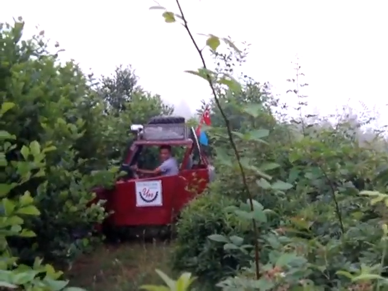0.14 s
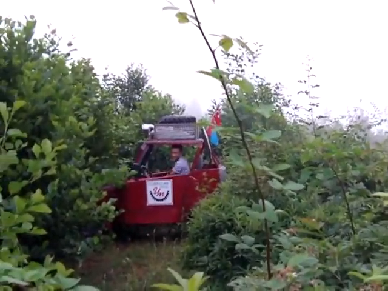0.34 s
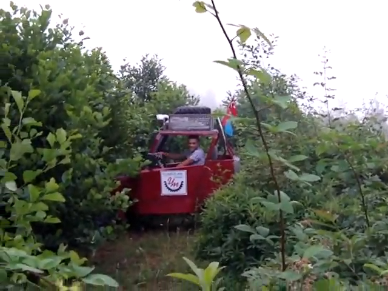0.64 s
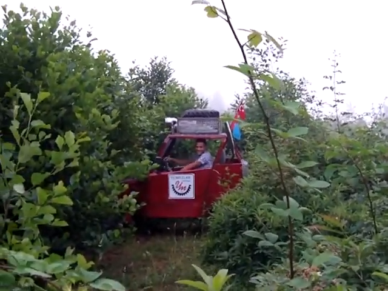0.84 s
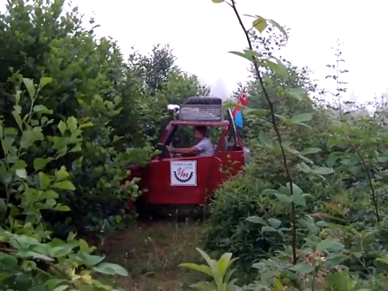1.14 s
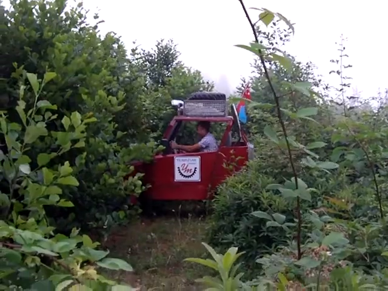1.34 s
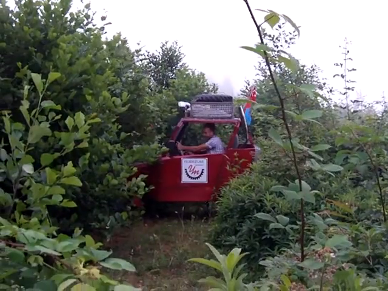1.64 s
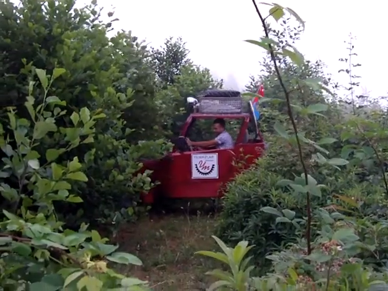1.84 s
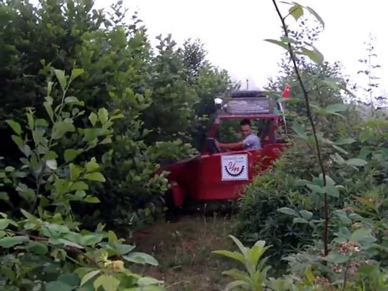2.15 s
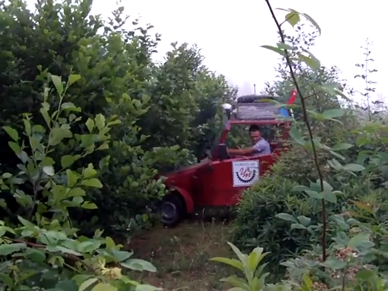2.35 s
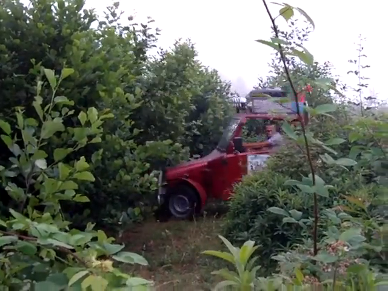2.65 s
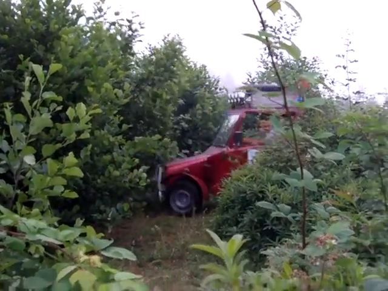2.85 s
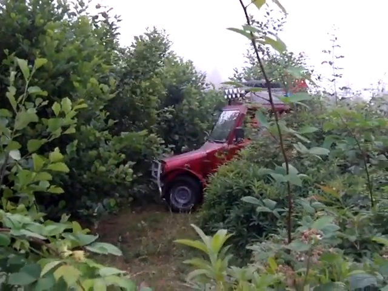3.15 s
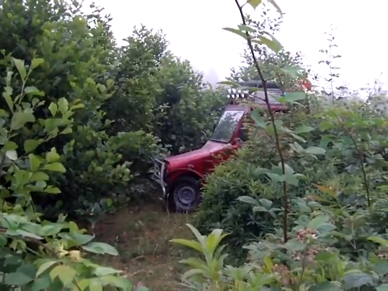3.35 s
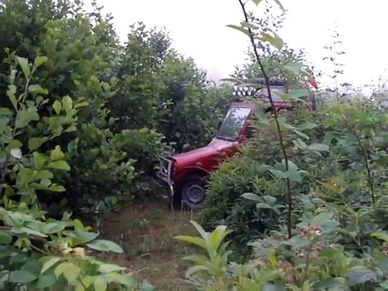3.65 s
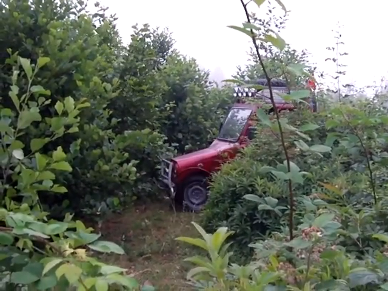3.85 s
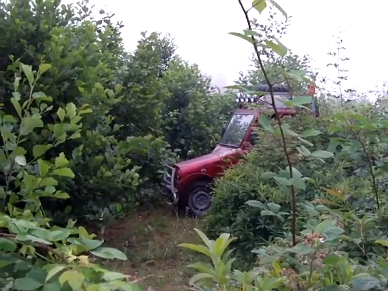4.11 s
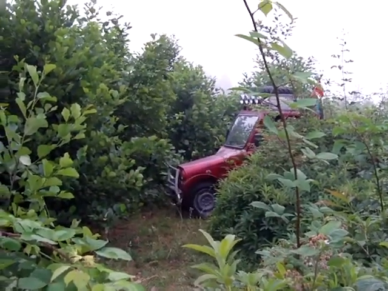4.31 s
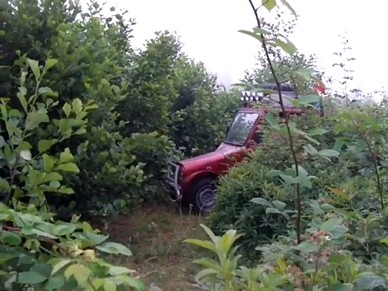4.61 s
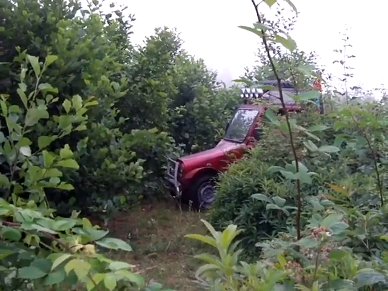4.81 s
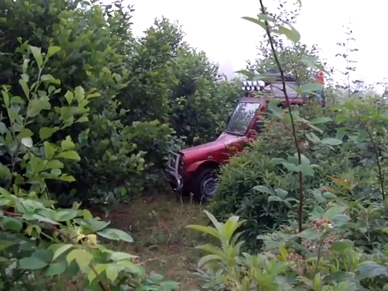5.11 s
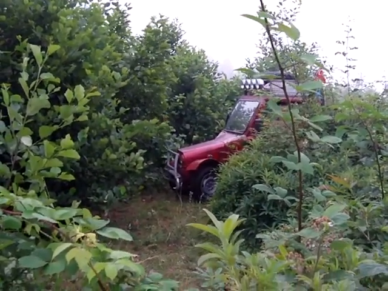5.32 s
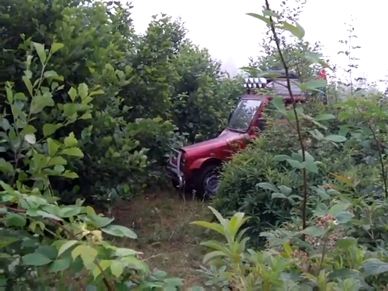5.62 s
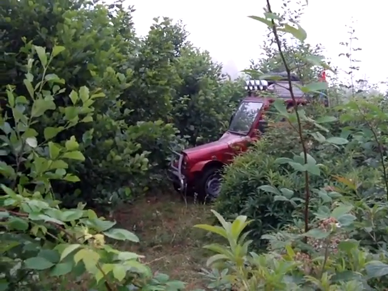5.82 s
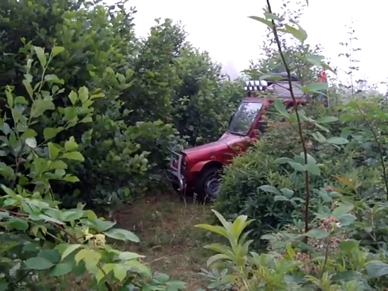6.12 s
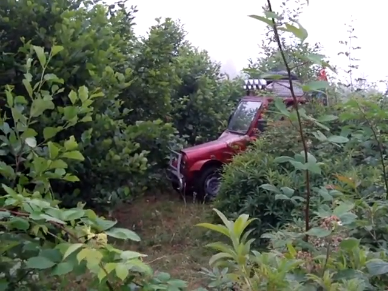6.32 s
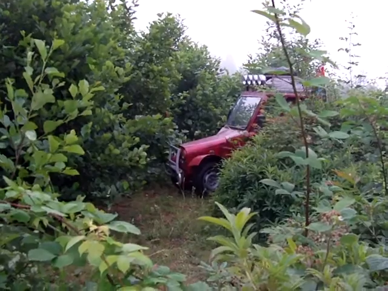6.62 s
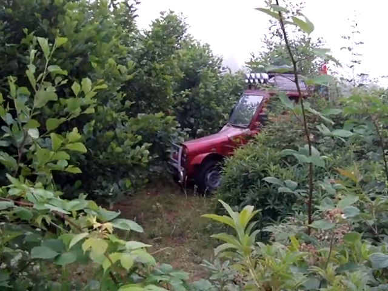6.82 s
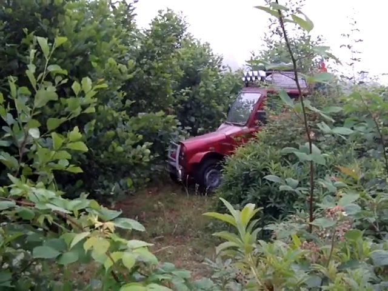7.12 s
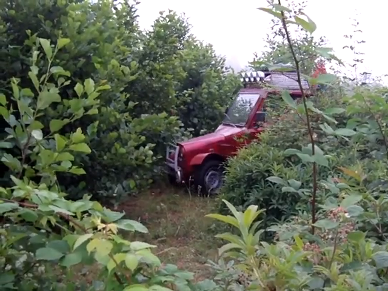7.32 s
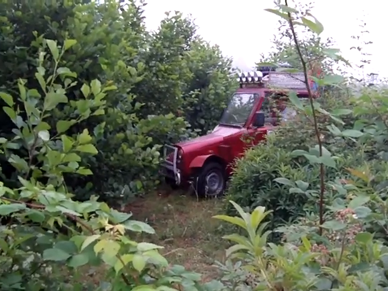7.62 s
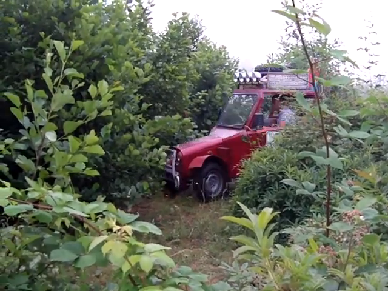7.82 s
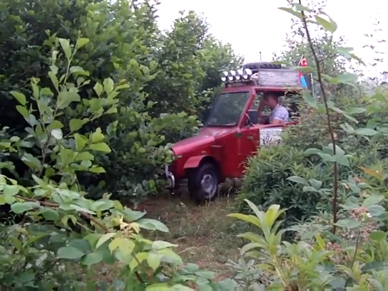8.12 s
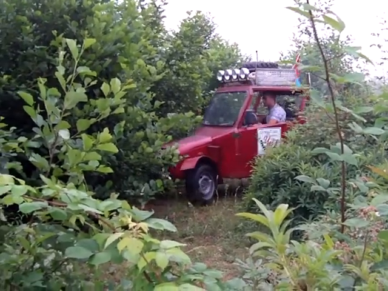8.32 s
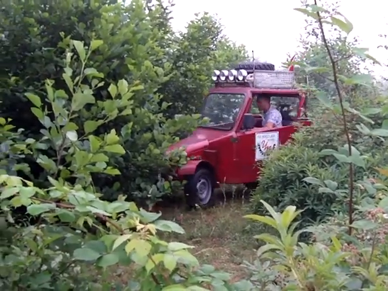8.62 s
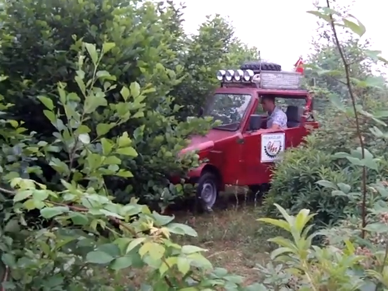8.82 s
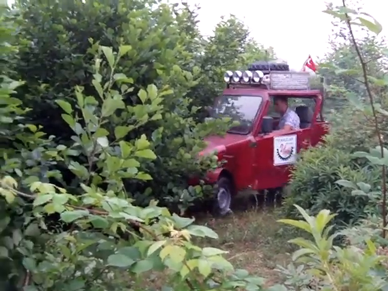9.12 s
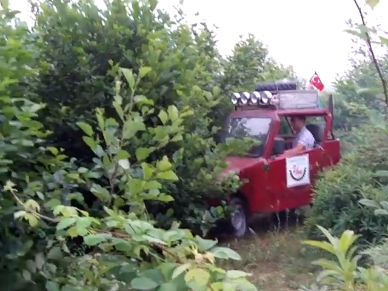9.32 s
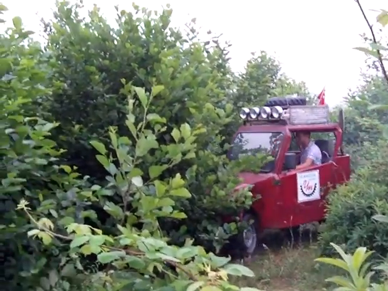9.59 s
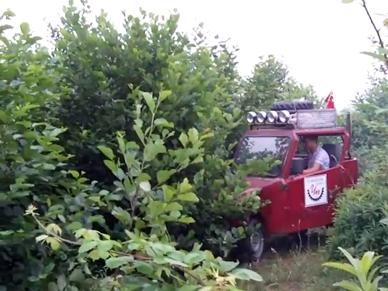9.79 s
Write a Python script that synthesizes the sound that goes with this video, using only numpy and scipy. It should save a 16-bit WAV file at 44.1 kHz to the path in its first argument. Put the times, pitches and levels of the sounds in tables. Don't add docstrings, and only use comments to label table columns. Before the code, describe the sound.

A knocking single-cylinder diesel puffs through wet brush, pulling hard, settling to a slow chugging idle, then working again as twigs snap.

```python
import sys
import numpy as np
from scipy import signal
from scipy.fft import rfft, irfft, next_fast_len
from scipy.io import wavfile
from scipy.ndimage import uniform_filter1d

SR = 44100
rng = np.random.default_rng(int(sys.argv[2]) if len(sys.argv) > 2 else 0)


def decibels_to_gain(level_db):
    exponent = np.asarray(level_db, float) / 20
    return 10 ** exponent


def log_audio(samples):
    frames = np.atleast_2d(samples).T
    limited = np.clip(frames, -1, 1)
    pcm = np.round(limited * 32767).astype(np.int16)
    wavfile.write(sys.argv[1], SR, pcm)


N = 438794
TIME_S = np.arange(N) / SR

# time in seconds, engine cycles per second.
SPEED = [(0.0, 9.27), (0.58, 8.468), (1.38, 13.431), (2.25, 9.336), (2.66, 10.581), (3.34, 8.817),
         (3.85, 8.542), (3.97, 8.1), (4.4, 7.814), (6.53, 7.955), (6.84, 11.009), (7.52, 10.879),
         (7.58, 10.009), (7.99, 11.748), (8.9, 10.234), (9.11, 10.336), (9.25, 10.285), (9.95, 8.307)]
# time in seconds, level in dB.
LEAN_JET = [(0, -35.5), (1.6, -32), (2.5, -31.5), (2.7, -34.5), (3.2, -34), (3.7, -37), (4.3, -37.5),
            (5.3, -37.5), (5.6, -35.5), (6.4, -38), (7.3, -37.5), (7.9, -32), (9.95, -30.5)]
# time in seconds, level in dB.
EFFORT = [(0, -37.5), (.5, -39), (.7, -32.5), (1.05, -36), (1.48, -27), (1.77, -31), (2.08, -30.5),
          (2.44, -29), (2.7, -35), (3.02, -39), (6.55, -37.5), (7.18, -31), (7.65, -33.5), (7.84, -30),
          (8.62, -32), (8.87, -33.5), (9.65, -38.5), (9.95, -34)]


def rms_one(x):
    return x / np.sqrt(np.mean(x ** 2) + 1e-20)


def in_time(rows, s):
    return np.interp(s, *np.transpose(rows))


def band_filter(x, order, hz, kind):
    return signal.sosfilt(signal.butter(order, hz, kind, fs=SR, output="sos"), x)


def coloured(x, spectrum):
    hz, db = np.transpose(spectrum)
    size = next_fast_len(N)
    log_hz = np.log(np.arange(1, size // 2 + 2) * SR / size)
    gain = decibels_to_gain(np.interp(log_hz, np.log(hz), db))
    return rms_one(irfft(rfft(x, size) * gain, size)[:N])


def drift(rate):
    r = np.exp(-80 * np.pi * rate / SR)
    slow = signal.lfilter([1], [1, -2 * r, r * r], rng.standard_normal(N // 40 + 2002))[2000:]
    return np.interp(np.arange(N) / 40, np.arange(len(slow)), rms_one(slow))


def ring(x, hz, t60):
    r, w = decibels_to_gain(-60 / (t60 * SR)), 2 * np.pi * hz / SR
    return signal.lfilter([0, np.sin(w)], [1, -2 * r * np.cos(w), r * r], x + 1e-18)


def grains(per_s, spread_db):
    sizes = decibels_to_gain(spread_db * np.minimum(rng.exponential(1, N), 4)) * rng.choice([-1, 1], N)
    return sizes * (rng.random(N) < per_s / SR)


def tinkles(per_s, low_hz, high_hz, cycles):
    clicks, dealt = grains(per_s, spread_db=2.5), rng.integers(0, 11, N)
    pitches = np.geomspace(low_hz, high_hz, 11) * rng.uniform(.97, 1.03, 11)
    return rms_one(sum(ring(clicks * (dealt == k), hz, cycles / hz) for k, hz in enumerate(pitches)))


def resonances(x, modes, wander_db=0):
    out = 0
    for k, (hz, width, db) in enumerate(modes):
        r = np.exp(-np.pi * width / SR)
        poles = [1, -2 * r * np.cos(2 * np.pi * hz / SR), r * r]
        tone = rms_one(signal.lfilter([1, 0, -1], poles, x))
        out = out + decibels_to_gain(db + wander_db * drift(9.9)) * (-1) ** k * tone
    return rms_one(out)


def bursts(times, dbs, rises_ms, hold_ms, fall_db_ms, tail_db, tail_db_ms, jumps_db=0):
    out, ms = np.zeros(N + SR), np.arange(-2000, 5500) * 1000 / SR
    for s, db, rise, hold, jump_db in np.broadcast(times, dbs, rises_ms, hold_ms, jumps_db):
        after = np.maximum(ms - hold, 0)
        fall = decibels_to_gain(-fall_db_ms * after) ** 2 + decibels_to_gain(tail_db - tail_db_ms * after) ** 2
        onset_db = 6 * np.minimum(ms - 1.5, 0) / max(rise, .3) - jump_db * (ms < 0)
        at = round(s * SR)
        out[at:at + len(ms)] += decibels_to_gain(db + onset_db) ** 2 * fall
    return np.sqrt(out[2000:2000 + N])


def crank():
    return .106 + np.cumsum(in_time(SPEED, TIME_S)) / SR


def strokes():
    # puff start in seconds, pipe level in dB, jet hiss in dB, knock level in dB.
    first_pull = [(0.761, -19.5, -17, -19), (0.861, -19, -17, -23.5), (1.045, -18, -17, -21.5),
                  (1.214, -19.5, -17.5, -19), (1.295, -21, -18.5, -20.5), (1.372, -21.5, -21, -20.5),
                  (1.449, -20, -18, -20), (1.524, -17.5, -18, -18.5), (1.765, -21, -23.5, -20.5),
                  (1.855, -19.5, -21, -20), (1.95, -23, -26.5, -23.5), (2.043, -18, -20.5, -23),
                  (2.146, -20, -30, -27.5), (2.25, -17.5, -18.5, -22), (2.355, -17, -18, -26.5),
                  (2.457, -16.5, -18.5, -25)]
    # puff start in seconds, pipe level in dB, jet hiss in dB, knock level in dB.
    second_pull = [(6.611, -18, -21.5, -24.5), (6.717, -19, -23, -27.5), (6.816, -17.5, -21, -27),
                   (6.909, -18, -20, -27), (6.997, -17, -22, -28), (7.176, -17, -20, -22.5),
                   (7.364, -17.5, -19, -23.5), (7.458, -18.5, -23, -28), (7.555, -22, -34, -29.5),
                   (7.649, -16.5, -19, -24.5), (7.742, -19.5, -21.5, -25.5), (7.832, -20, -22, -25.5),
                   (8.547, -21.5, -31, -30), (8.736, -21.5, -33, -22.5)]
    # start in seconds, level in dB, brightness in dB.
    pinking = [(1.094, -30, -2), (1.924, -23, -1.5), (2.528, -28, -1.5), (2.61, -34, 8.5),
               (6.335, -31, 5.5), (7.897, -28.5, 3.5), (7.983, -28.5, -2), (8.889, -30, -2),
               (8.988, -29, -2), (9.085, -26, 0.5), (9.921, -28, -3)]
    # time in seconds, level in dB.
    lean_knock = [(0, -36), (.7, -35), (2.7, -39.5), (3.4, -39.5), (5.5, -36.5), (7.3, -38.5),
                  (9.95, -40.5)]
    lean_rise_ms, full_rise_ms = 4.06, 1.85
    slower_ms_per_db = 0.22
    lean_lead, full_lead = .415, .25
    puff_spread_db, knock_spread_db = .6, 2.0

    turned = crank()
    count = np.arange(1, int(turned[-1]) + 2)
    past_end_s = (count - turned[-1]).clip(0) / SPEED[-1][1]
    s = past_end_s + np.interp(count, turned, TIME_S)
    period = 1 / in_time(SPEED, s)
    luck = rng.standard_normal((len(s), 5))

    jet_db = in_time(LEAN_JET, s)
    pipe_db = -25 + 0.26 * (jet_db + 36) + puff_spread_db * luck[:, 0]
    rise_ms = lean_rise_ms + slower_ms_per_db * (in_time(EFFORT, s) + 36).clip(0)
    puffs = np.c_[s, pipe_db, jet_db + puff_spread_db * luck[:, 1], rise_ms * np.exp(.3 * luck[:, 2])]
    knock_db = in_time(lean_knock, s) + knock_spread_db * luck[:, 3]
    hits = np.c_[s - lean_lead * period, knock_db, -6.5 - 0.5 * luck[:, 4]]

    for at, full_pipe_db, hiss_db, full_knock_db in [*first_pull, *second_pull]:
        k = np.argmin(abs(s - at))
        puffs[k] = at, full_pipe_db, hiss_db, full_rise_ms + slower_ms_per_db * max(-18.5 - hiss_db, 0)
        hits[k] = at - full_lead * period[k], full_knock_db, -5
    for row in pinking:
        hits[np.argmin(abs(hits[:, 0] - row[0]))] = row
    return puffs[s < N / SR], hits[hits[:, 0] < N / SR]


def exhaust(puffs):
    # pitch in Hz, width in Hz, level in dB.
    pipe_modes = [(1474, 200, -11.5), (1870, 67, -5.5), (2090, 250, -3), (2426, 117, -2), (2577, 135, 1),
                  (3050, 440, 1), (3620, 350, 0), (4350, 650, -5.5)]
    # pitch in Hz, level in dB per Hz.
    jet_colour = [(300, -7), (900, -14.5), (2000, -6), (4500, 0.5), (6500, -0.5), (10000, 0), (13000, -8),
                  (15500, -20.5)]
    stroke_samples = 900
    s, pipe_db, jet_db, rise = np.transpose(puffs)
    charge = np.clip((jet_db + 30) / 6, 0, 1)

    flow = grains(5000, spread_db=1.0) + 1.16 * rng.standard_normal(N)
    pipe = resonances(flow, pipe_modes, wander_db=1.4)
    upper = band_filter(pipe, 2, [3000, 4000], "band")
    pipe = pipe + upper * 0.051 * (in_time(LEAN_JET, TIME_S) + 36)
    pipe = pipe / np.sqrt(uniform_filter1d(pipe ** 2, stroke_samples))

    jet = coloured(grains(12000, spread_db=4.0) + 0.18 * tinkles(2500, 4030, 13130, cycles=22), jet_colour)
    edge = band_filter(jet, 2, 12000, "high")
    dulling = 0.34 * np.clip((-29 - jet_db) / 7.0, 0, 1)
    jet = jet - edge * np.interp(TIME_S, s, dulling)

    tone = pipe * bursts(s, pipe_db - 4.0, rise * 1.27, 9.6 + 3.3 * charge, 0.57, -10.5, 0.25,
                         jumps_db=7.5 * charge)
    hiss = jet * bursts(s, jet_db + 1.0, rise, 5.45 + 1.6 * charge, 0.7, -7.0, 0.33, jumps_db=11.5 * charge)
    sputter = drift(140)
    sputter = rms_one(sputter - uniform_filter1d(sputter, stroke_samples))
    return tone * decibels_to_gain(1.8 * sputter) + hiss * decibels_to_gain(1.3 * sputter)


def knocks(hits):
    # pitch in Hz, width in Hz, level in dB.
    block_modes = [(1380, 67, -12.5), (1514, 190, -3.5), (1687, 620, -9.5)]
    # pitch in Hz, level in dB per Hz.
    cover_colour = [(1700, -28), (2100, 6), (2800, -0.5), (3500, -1.5), (5000, -8), (8000, -15.5),
                    (13000, -30)]
    # pitch in Hz, width in Hz, level in dB.
    sump_modes = [(534, 150, -4), (907, 154, 1.5)]
    rebound_s, rebound_db = .0098, -7.5
    s, level_db, bright_db = np.transpose(hits)
    at = (s * SR).astype(int)

    struck = 0
    for hz, width, db in block_modes:
        blows = np.zeros(N)
        blows[at] = decibels_to_gain(level_db + db + 10 + rng.normal(0, 1, len(s)))
        blows += decibels_to_gain(rebound_db) * np.roll(blows, round(rebound_s * SR))
        struck = struck + ring(blows, hz, .014 + 2.5 / width)
    struck = band_filter(struck, 1, [1150, 2000], "band")

    rattle = resonances(rng.standard_normal(N), block_modes)
    rattle = rattle * bursts(s + .002, level_db - 8, 1, 7, .6, -8, .25)
    covers = coloured(grains(6000, spread_db=0.0), cover_colour)
    covers = covers * bursts(s - .001, level_db + bright_db, .3, 2.2, 0.55, -15, 0.35)
    sump_db = np.maximum(-33.5 + 1.0 * (level_db + 24.0) - 0.51 * bright_db, -44.5)
    sump = resonances(rng.standard_normal(N), sump_modes)
    sump = sump * bursts(s + 0.0016, sump_db, 0.73, 6.0, 0.63, -6, 0.17)
    return struck + rattle + covers + sump


def snaps():
    # start in seconds, peak level in dB, ringing pitch in Hz.
    snap_rows = [(2.5546, -19, 2730), (2.6014, -17, 2400), (2.7202, -21, 4240), (3.6584, -27, 2560),
                 (4.1684, -38, 2840), (4.2704, -40, 2410), (4.398, -21, 1850), (5.0574, -42, 2010),
                 (5.3084, -24, 2430), (6.318, -18, 2420), (6.335, -26, 2440), (6.4313, -27, 1870),
                 (7.9833, -14, 2090), (9.0139, -23, 3720), (9.791, -11, 2480), (9.838, -19.5, 2430)]
    s, db, pitch_hz = np.transpose(snap_rows)
    crack = bursts(s - .001, db - 7.5, .3, 0.95, 1.14, -5.5, 0.83) * rng.standard_normal(N)
    out = decibels_to_gain(-10) * band_filter(crack, 2, [1500, 9000], "band")
    for at, hz in zip((s * SR).astype(int) - 100, pitch_hz):
        out[at:at + 3000] += decibels_to_gain(-12) * ring(crack[at:at + 3000], hz, .004)
    return out


def rubs():
    # start in seconds, pitch in Hz, level in dB, length in ms.
    rub_rows = [(3.245, 4200, -36, 15), (3.245, 7060, -51, 40), (3.333, 4200, -41, 30),
                (3.333, 8600, -43, 12), (3.333, 7100, -51, 34), (3.509, 4430, -37, 19),
                (3.578, 4350, -37, 20), (6.38, 2590, -43, 16), (8.109, 3260, -32.5, 46),
                (8.159, 2370, -32, 36), (8.165, 3180, -29.5, 18), (8.4, 565, -37, 28),
                (8.575, 4250, -31, 13), (8.715, 610, -42, 35), (8.72, 509, -40, 90), (9.75, 714, -44, 13),
                (9.79, 760, -38, 11), (9.855, 755, -37.5, 31)]
    out, ms = np.zeros(N), np.arange(5000) * 1000 / SR
    for s, hz, db, length in rub_rows:
        tone = rms_one(ring(rng.standard_normal(6000), hz, .015 + 40 / hz)[1000:])
        at = round(s * SR)
        shape = np.minimum(ms / 3.0, 1) * decibels_to_gain(-1.2 * np.maximum(ms - length, 0))
        out[at:at + 5000] += (decibels_to_gain(db) * tone * shape)[:N - at]
    return out


def bed(hits):
    # pitch in Hz, level in dB per Hz.
    rumble_colour = [(25, -17), (50, -32), (100, -9), (135, -9.5), (170, -1), (270, -1.5), (340, -5.5),
                     (430, 0.5), (580, 4), (900, 0), (1200, -7), (2000, -44)]
    # pitch in Hz, level in dB per Hz.
    clatter_colour = [(700, -38), (1100, -6), (1450, 8.5), (1700, -2.5), (1900, 1.5), (2550, 1.5),
                      (3500, -2), (5000, -6.5), (7000, -17), (9000, -70)]
    # pitch in Hz, level in dB per Hz.
    leaf_colour = [(1500, -42), (3500, -6), (5000, -4.5), (7000, -10.5), (10000, -15), (13000, -24.5),
                   (15500, -35)]
    # time in seconds, level in dB.
    brush = [(0, -43), (.9, -41.5), (1.08, -42), (1.55, -34.5), (1.77, -42.5), (2.44, -38), (2.63, -45.5),
             (4.02, -50), (6.55, -48.5), (6.85, -38), (7.18, -41.5), (7.65, -39), (7.84, -45), (8.09, -30),
             (8.37, -41), (8.62, -33), (8.87, -40), (9.95, -44.5)]
    clatter_db, leaves_db = in_time(EFFORT, TIME_S), in_time(brush, TIME_S)
    cycle = np.interp(TIME_S, hits[:, 0], np.arange(len(hits))) % 1

    rumble_db = -48.5 + 0.88 * (clatter_db + 37)
    throb_db = 1.35 * drift(27) + 1.6 * np.cos(2 * np.pi * (cycle - .22))
    rumble = coloured(rng.standard_normal(N), rumble_colour) * decibels_to_gain(rumble_db + 2.5 + throb_db)

    clatter = coloured(0.5 * tinkles(1200, 1810, 7510, cycles=94) + rng.standard_normal(N), clatter_colour)
    leaves = coloured(grains(2500, spread_db=5.0) + 2.2 * rng.standard_normal(N), leaf_colour)
    crisp = band_filter(leaves, 2, 11000, "high")
    leaves = leaves + crisp * np.clip(.06 * (leaves_db + 49), -.8, .8)

    shake = drift(19)
    clatter_db = clatter_db - 1.0 - 2.4 * cycle ** 6.1 + 1.6 * shake
    leaves_db = leaves_db - 1.0 + 1.1 * shake + 2.0 * drift(17)
    return rumble + clatter * decibels_to_gain(clatter_db) + leaves * decibels_to_gain(leaves_db)


def scene():
    puffs, hits = strokes()
    parts = exhaust(puffs) + knocks(hits) + snaps() + rubs()
    return (band_filter(parts, 2, 330, "high") + bed(hits))[None]


def top_cut(x):
    return signal.sosfilt(signal.butter(12, 16460, fs=SR, output="sos"), x)


def record(dry):
    # pitch in Hz, width in Hz.
    notches = [(1000, 373), (7870, 650)]
    for hz, width in notches:
        dry = signal.lfilter(*signal.iirnotch(hz, hz / width, fs=SR), dry)
    dry = .5 * np.tanh(dry / .5)
    dry = band_filter(dry, 1, 100, "high")
    dry = signal.sosfilt(signal.ellip(10, .5, 45, 15290, fs=SR, output="sos"), dry)
    return top_cut(dry)


dry = scene()
out = record(dry)
log_audio(out)
```